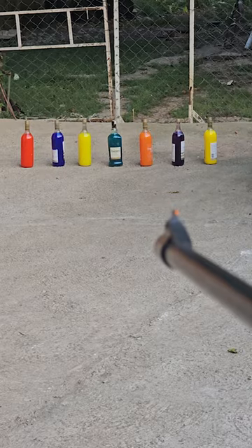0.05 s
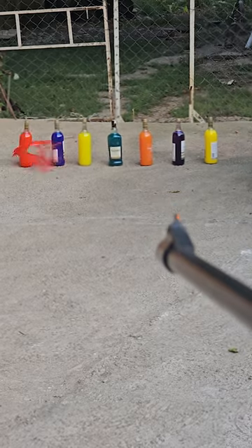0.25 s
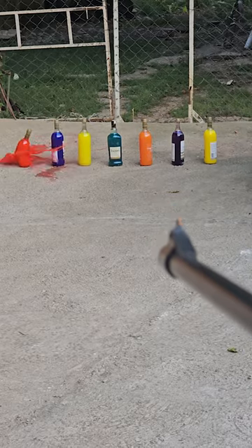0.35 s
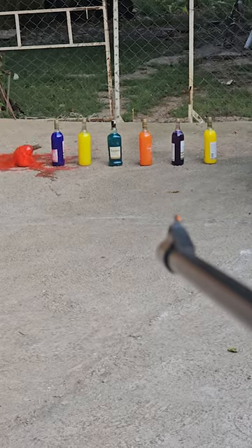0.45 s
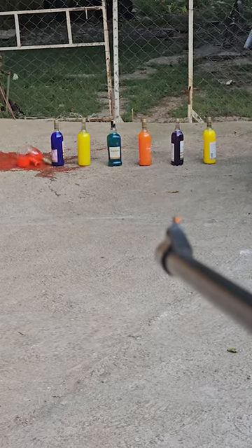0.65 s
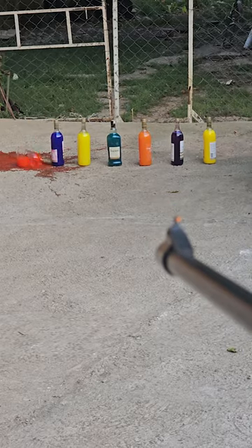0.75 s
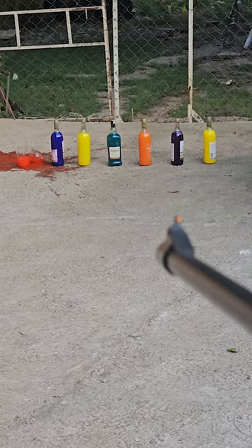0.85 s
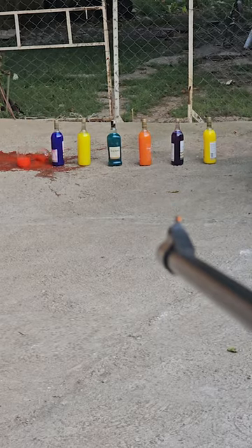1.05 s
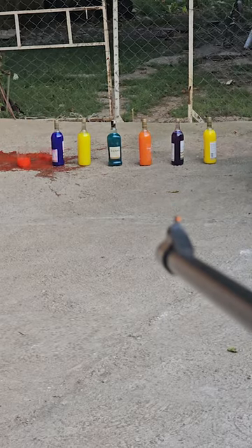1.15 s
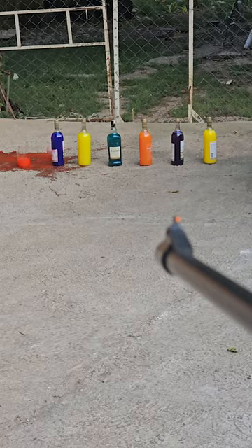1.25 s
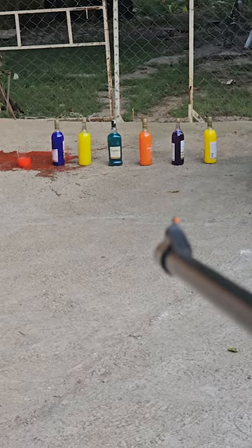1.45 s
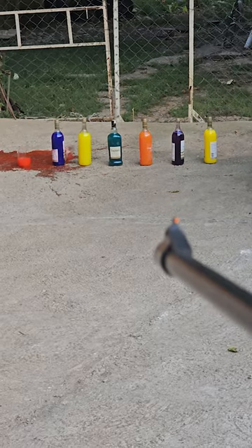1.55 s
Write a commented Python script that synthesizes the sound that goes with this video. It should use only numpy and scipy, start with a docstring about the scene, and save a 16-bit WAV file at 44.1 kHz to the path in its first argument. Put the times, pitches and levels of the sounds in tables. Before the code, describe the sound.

A sharp, nearby air rifle shot smashes a liquid-filled glass bottle across an outdoor yard. Heavy pieces knock and splinters ring on the concrete while the contents glug and splash, then a hollow fragment rocks softly over grit.

```python
"""A spring air rifle fires close by: the piston slides and slams, the muzzle pops, the spring buzzes.
At 0.29 s the pellet bursts a liquid-filled glass bottle on a concrete yard. Droplets and splinters
spray out and land, heavy pieces knock, shards ring and bounce, the liquid glugs and splashes.
From 0.77 s a hollow piece rolls and rocks over grit. The yard echoes faintly throughout."""
import sys
import numpy as np
from scipy import signal
from scipy.fft import rfft, irfft, next_fast_len
from scipy.io import wavfile
from scipy.ndimage import map_coordinates

SR = 44100
rng = np.random.default_rng(int(sys.argv[2]) if len(sys.argv) > 2 else 0)


def file_out(sig):
    """Save sig as 16-bit WAV at sys.argv[1]."""
    # one column per channel
    cols = np.atleast_2d(sig).T
    # limit, then scale
    lim = np.clip(cols, -1, 1)
    pcm = np.round(lim * 32767).astype(np.int16)
    wavfile.write(sys.argv[1], SR, pcm)


N = 70560

# Piston slam, muzzle pop, spring rebounds: start_s, level_db, t60_s
SHOT_PULSES = [(0.2477, -12, 0.038), (0.255, -19.5, 0.011), (0.2589, 1.5, 0.0093), (0.2645, -5.5, 0.012)]
# Rifle body: pitch_hz, level_db, t60_s
RIFLE_MODES = [(437.5, -14.5, 0.15), (210, -11.5, 0.041), (287, -23, 0.11), (636, -32, 0.12),
               (1318, -19, 0.11)]
# Rifle noise spectra: freq_hz, density_db
SHOT_SPECTRUM = [(60, -24.5), (130, -11.5), (480, 1.5), (1000, -12), (2500, -6), (4700, -16), (8500, -18.5),
                 (11200, -9.5), (13500, -17), (15500, -23)]
SNAP_SPECTRUM = [(1000, -17.5), (5000, -7.5), (8300, -0.5), (10000, -9.5), (13000, 0), (15500, -1.5)]
BUZZ_SPECTRUM = [(100, -24), (600, -3.5), (5500, -6), (8500, -11), (11500, -8), (15500, -13.5)]
# Handling rumble: time_s, level_db
HANDLING_LEVELS = [(0, -72), (.05, -58.5), (.15, -65), (.22, -58), (.29, -44.5), (.36, -51.5), (.42, -74),
                   (.6, -77.5)]
# Sprays of splinters and liquid: start_s, level_db, rise_s, t60_s
SPRAY_PULSES = [(.452, -21.5, 0.011, 0.36), (.476, -22.5, 0.0035, 0.2), (0.52, -28, 0.0018, 0.055),
                (.6, -33.5, .003, 0.21), (.67, -40.5, 0.014, 0.4), (0.779, -35.5, 0.0071, .3),
                (0.906, -49, .002, 0.7), (.997, -41.5, .002, 0.54), (1.24, -51.5, .005, 0.53)]
# Heavy pieces breaking and landing: start_s, pitch_hz, ring_db, t60_s, clack_db
KNOCK_HITS = [(.3036, 994, -10, 0.019, -20.5), (.306, 802, -22, 0.16, -45), (.453, 1456, -29, 0.14, -34.5),
              (.465, 1523, -20.5, 0.094, -34), (.478, 2144, -14, 0.026, -29),
              (0.519, 1368, -16.5, 0.068, -30.5), (.521, 748, -30.5, 0.068, -39),
              (.568, 1895, -29, 0.049, -38.5), (.575, 500, -33, 0.13, -63),
              (0.6528, 428, -24, 0.059, -34.5), (.672, 760, -33.5, 0.16, -41), (.686, 496, -36, 0.15, -36),
              (.823, 1250, -36, .07, -42), (.829, 825, -30, .07, -44), (1.247, 2270, -44.5, 0.084, -57),
              (1.354, 1280, -66, 0.045, -49.5)]
# Modes by shard name: pitch_hz, level_db, t60_s
SHARD_MODES = {"chip": [(10292, -6, .075), (11850, -26, .15), (9071, -28, .15)], "blade": [(4960, 0, .24),
               (11840, -7, .17), (9604, -13, .25), (7375, -19, .2)], "wall": [(2945, 0, .42),
               (9385, -13, .25), (3252, -12, .3), (2745, -10, .25), (3914, -9, .25)],
               "shoulder": [(2385, 0, .1), (3965, -8, .12), (9590, -9, .35)], "flake": [(10115, 0, .13),
               (9950, -14, .08)], "sliver": [(5882, -1, .38), (9390, -3, .28)],
               "needle": [(13100, -5, .35)], "corner": [(6288, -9, .22), (10300, -1, .12),
               (11870, -3, .15)]}
# Shards landing: start_s, shard, level_db, rise_s, pan_db
SHARD_HITS = [(0.311, "wall", -25.5, 0.0075, 6), (0.6004, "chip", -12.5, 0.0011, -7.5),
              (0.6096, "chip", -14, 0.0015, -5), (.612, "blade", -33, 0.0047, 6),
              (0.689, "shoulder", -31, 0.0017, 3), (0.712, "flake", -43, 0.00082, -6),
              (0.833, "chip", -37, 0.003, 0), (0.904, "flake", -39, 0.00036, -5),
              (0.667, "wall", -36, .002, 2.5), (.793, "blade", -37.5, .003, 5.5),
              (0.885, "needle", -43, .0066, 0), (0.998, "corner", -37, .0007, 1),
              (.95, "sliver", -44, .003, 5), (1.01, "sliver", -48, .006, 5), (1.028, "blade", -47, .004, 8),
              (1.033, "corner", -42, .0005, -2), (1.034, "flake", -33, .0007, -2),
              (1.065, "chip", -35, 0.0031, -7), (1.092, "flake", -39, 0.0013, -3.5),
              (1.306, "flake", -37, 0.014, -4), (1.379, "flake", -40.5, .007, 0),
              (1.433, "flake", -43, .008, -4)]
# Grit ticks: start_s, level_db
GRIT_HITS = [(0.3033, -6.5), (.48, -30), (1.068, -41), (1.248, -44), (.5195, -25), (.906, -35),
             (.9981, -33), (1.033, -32), (1.272, -39)]
# Hollow piece rolling: time_s, pitch_hz, level_db
ROLL_PATH = [(.765, 1020, -49), (.81, 950, -48), (.835, 830, -36), (.88, 875, -51), (.91, 900, -49),
             (1.0, 885, -50), (1.06, 925, -52), (1.11, 930, -58.5), (1.175, 930, -45.5),
             (1.235, 960, -42.5), (1.29, 950, -62), (1.33, 935, -63.5), (1.385, 870, -50.5),
             (1.445, 825, -53.5), (1.485, 840, -59), (1.55, 945, -51), (1.6, 930, -60.5)]
# Hollow piece bumping: start_s, pitch_hz, level_db
BUMP_HITS = [(0.864, 850, -38), (.942, 880, -39), (1.399, 860, -47), (1.419, 830, -45), (1.523, 900, -46),
             (1.187, 926, -29), (1.2146, 1000, -32), (1.2313, 926, -33.5), (1.2466, 1000, -38),
             (1.2583, 926, -44)]
# Glass noise spectra: freq_hz, density_db
SPRAY_SPECTRUM = [(150, -26), (400, -10.5), (800, 0.5), (1700, -7.5), (3000, -4.5), (5500, -2),
                  (8300, -8.5), (11500, -2), (15500, -14)]
CLACK_SPECTRUM = [(100, -32), (300, -32.5), (500, -1), (950, -1), (2000, -6), (4000, -13.5), (15000, -22)]
TICK_SPECTRUM = [(200, -20.5), (1000, -6), (4000, -5), (15500, -2.5)]
SCRAPE_SPECTRUM = [(100, -22), (300, -1.5), (520, 14.5), (900, 5), (1400, -7), (3000, -32), (15000, -6.5)]
# Glug of the emptying bottle: time_s, pitch_hz, level_db
GLUG_PATH = [(.32, 92.4, -43), (.35, 98.2, -46.5), (.45, 103.4, -40), (.5, 123.3, -42.5), (.56, 128.6, -47),
             (.62, 135.1, -47), (.68, 141, -83)]
# Big bubbles: start_s, pitch_hz, level_db
BIG_BUBBLES = [(0.476, 162.5, -27), (.577, 181.6, -23), (0.604, 236, -35.5), (0.736, 152, -38.5)]
# Pouring liquid: time_s, relative_db
SPLASH_LEVELS = [(.3, -55), (.345, -31.5), (.43, -42.5), (.5, -40.5), (.62, -43), (.69, -31.5),
                 (.77, -47.5), (.84, -40), (.92, -51.5), (1.1, -54), (1.6, -68.5)]
# Liquid and background spectra: freq_hz, density_db
SPLASH_SPECTRUM = [(25, -22), (80, -4), (180, -3), (550, 4), (1200, -1.5), (3000, -23), (15000, -16)]
HANDLING_SPECTRUM = [(15, -1), (33, 1.5), (70, 0.5), (150, -19.5), (400, -49)]
AIR_SPECTRUM = [(15, -9.5), (60, -3.5), (200, -10.5), (400, -19), (1100, -15.5), (1600, -27), (4000, -25.5),
                (8000, -55.5), (15000, -58)]
# Left-right likeness of noise: freq_hz, correlation
RIFLE_CORRELATION = [(200, 0), (800, 0.24), (3000, 0)]
YARD_CORRELATION = [(50, 0.63), (500, 0.98), (1200, 0.58), (3000, 0.046), (12000, 0.068)]
# Yard reverberation: freq_hz, t60_s
YARD_DECAY = [(150, 0.13), (1000, 0.38), (4000, 0.88), (12000, 0.55)]

RELEASE_S, SLAM_S, BURST_S = 0.2206, 0.25, 0.2902
TOP_HZ = 15900
LN_1000 = np.log(1000)  # 60 dB of decay
TIME_S = np.arange(N) / SR


def rifle(slide_db_per_s=1043):
    """The piston slides and slams; the shot snaps, the spring buzzes, the body rings."""
    sliding = (TIME_S > RELEASE_S) & (TIME_S < SLAM_S)
    slide = amp(-16 + slide_db_per_s * np.minimum(TIME_S - SLAM_S, 0)) * sliding
    power = slide ** 2 + sum((amp(db) * fade(s, t60_s)) ** 2 for s, db, t60_s in SHOT_PULSES)
    snap = amp(-10.5) * fade(0.2502, t60_s=0.01) * noise(SNAP_SPECTRUM, RIFLE_CORRELATION)
    buzz = amp(-16) * fade(SLAM_S, t60_s=0.29) * noise(BUZZ_SPECTRUM, RIFLE_CORRELATION)
    shot = np.sqrt(power) * noise(SHOT_SPECTRUM, RIFLE_CORRELATION)
    body = sum(amp(db) * ring(SLAM_S, hz, t60_s, rise_s=0.001, lead_rad=0.39)
               for hz, db, t60_s in RIFLE_MODES)
    return shot + snap + buzz + body


def recoil(jolt_hz=78, width_s=0.0083):
    """The kick: a low jolt and a dying sway over handling rumble."""
    age_s = TIME_S - SLAM_S
    jolt = amp(-15) * np.sin(2 * np.pi * jolt_hz * age_s) * np.exp(-(age_s / width_s) ** 2 / 2)
    sway = amp(-21.5) * ring(SLAM_S, hz=33.3, t60_s=0.13, rise_s=0.0022)
    handling = amp(curves(HANDLING_LEVELS)[0]) * noise(HANDLING_SPECTRUM)
    return pan(11) * (jolt + sway + handling)


def bottle_burst(rise_s=0.0029, hold_s=0.039, t60_s=0.17):
    """The bottle flies apart; sprays follow. Droplets hiss, splinters ring."""
    age_s = np.maximum(TIME_S - BURST_S, 0)
    decay = np.exp(-LN_1000 * np.maximum(age_s - hold_s, 0) / t60_s)
    burst = amp(-16) * (1 - np.exp(-age_s / rise_s)) * decay
    spray_power = sum((amp(db) * fade(s, t60, rise)) ** 2 for s, db, rise, t60 in SPRAY_PULSES)
    flow = np.sqrt(burst ** 2 + spray_power)
    hiss = amp(-5.5 + 0.9 * wobble(500)) * flow * noise(SPRAY_SPECTRUM)
    return hiss + amp(-5) * splinters(flow)


def splinters(flow, count=2200, low_hz=1500, range_db=25.5, median_t60_s=0.05):
    """Tiny pieces ring briefly, each scaled by the spray that carries it."""
    out = np.zeros((2, N + SR))
    age_s = np.arange(SR // 8) / SR
    for when, pitch, life, size, side, phase in rng.random((count, 6)):
        start = int(when * N)
        hz = low_hz + (TOP_HZ - low_hz) * pitch
        decay = np.exp(-LN_1000 * age_s / (median_t60_s * 2 ** (2 * life - 1)))
        gain = flow[start] * amp(range_db * size) * pan(10 * (2 * side - 1))
        tone = np.sin(2 * np.pi * (hz * age_s + np.array([[0], [phase]])))
        out[:, start:start + len(age_s)] += gain * decay * tone
    shaped = filtered(out[:, :N], lambda hz: amp(log_interp(SPRAY_SPECTRUM, hz)))
    return unit_rms(shaped) * np.sqrt(np.mean(flow ** 2))


def knocks():
    """Heavy wet pieces: a clack, a loose clatter and one short ring each."""
    clatter = amp(-5 + 2.5 * wobble(300))
    clacks = sum(amp(db) * (fade(s, t60_s=0.039) + clatter * fade(s, t60_s=0.086, rise_s=0.0011))
                 for s, _, _, _, db in KNOCK_HITS)
    rings = sum(amp(db) * ring(s, hz, t60_s, rise_s=0.00044, lead_rad=0.23)
                for s, hz, db, t60_s, _ in KNOCK_HITS)
    return clacks * noise(CLACK_SPECTRUM) + rings


def shards(chatter_hz=404, tick_t60_s=0.0088):
    """Landing shards tick and ring; skid chatter roughens high modes most. Grit only ticks."""
    rings = np.zeros((2, N))
    ticks = sum(amp(db) * fade(s, tick_t60_s) for s, db in GRIT_HITS)
    steady = np.exp(1j * np.array([[0.45], [-0.45]]) * -1)  # right leads
    for start_s, shard, level_db, rise_s, pan_db in SHARD_HITS:
        chatter = 0.78 * np.array([wobble(chatter_hz) + 1j * wobble(chatter_hz) for _ in range(2)])
        for hz, mode_db, t60_s in SHARD_MODES[shard]:
            tone = np.exp(2j * np.pi * hz * (TIME_S - start_s)) * (steady + chatter * np.sqrt(hz / TOP_HZ))
            rings += pan(pan_db) * amp(level_db + mode_db) * fade(start_s, t60_s, rise_s) * tone.imag
        ticks = ticks + amp(level_db - 10) * fade(start_s, tick_t60_s)
    return rings + ticks * noise(TICK_SPECTRUM)


def rolling(grain_hz=160, overtone_ratio=2.39):
    """Rough concrete excites the hollow piece; its pitch shifts as its mouth turns."""
    pitch_hz, level_db = curves(ROLL_PATH)
    phase = 2 * np.pi * np.cumsum(pitch_hz) / SR + np.array([[0.25], [-0.25]])
    contact = amp(level_db) * (TIME_S > ROLL_PATH[0][0])
    drive = contact * (wobble(grain_hz) + 1j * wobble(grain_hz))
    force = np.abs(drive) / np.abs(drive).max()
    overtone = amp(-30) * np.sqrt(force) * np.exp(1j * overtone_ratio * phase)
    tone = np.real(drive * (np.exp(1j * phase) + overtone))
    scrape = amp(-10) * contact * noise(SCRAPE_SPECTRUM)
    return pan(1.23) * tone + scrape


def bumps(t60_s=0.13, overtone_ratio=2.39):
    """The hollow piece rocks and crunches grit; its close tones overlap and beat."""
    tones = crunch = 0
    for start_s, hz, db in BUMP_HITS:
        cavity = ring(start_s, hz, t60_s, rise_s=0.003, lead_rad=0.4)
        overtone = amp(-20) * ring(start_s, overtone_ratio * hz, t60_s)
        tones += amp(db) * (cavity + overtone)
        crunch += amp(db - 15) * fade(start_s, t60_s=0.053)
    return pan(4.2) * tones + crunch * noise(CLACK_SPECTRUM)


def liquid():
    """The contents glug out, bubble and splash on the concrete."""
    glug_hz, glug_db = curves(GLUG_PATH)
    emptying = (TIME_S > GLUG_PATH[0][0]) & (TIME_S < GLUG_PATH[-1][0])
    glug = emptying * amp(glug_db + 1.3 * wobble(28)) * np.sin(2 * np.pi * np.cumsum(glug_hz) / SR)
    bubbles = sum(amp(db) * ring(s, hz, t60_s=0.064, rise_s=0.0042) for s, hz, db in BIG_BUBBLES)
    splash_db = curves(SPLASH_LEVELS)[0] - 5.5 + 4.1 * wobble(90)
    pouring = TIME_S > SPLASH_LEVELS[0][0]
    return glug + bubbles + pouring * amp(splash_db) * noise(SPLASH_SPECTRUM)


def walls(x, count=8, max_delay_s=0.033):
    """Early reflections, random in delay and sign on each side."""
    out = np.zeros((2, N))
    for side in range(2):
        for delay, sign in rng.random((count, 2)):
            lag = 1 + int(delay * max_delay_s * SR)
            out[side, lag:] += np.sign(sign - 0.5) * x[side, :-lag]
    return out / np.sqrt(count)


def yard(x, rise_s=0.0018):
    """Diffuse tail; each frequency decays at its own rate."""
    hz, age_s, bins = signal.stft(rng.standard_normal((2, SR // 2)), SR, nperseg=256)
    decay = np.exp(-LN_1000 * age_s / log_interp(YARD_DECAY, hz)[:, None])
    tail = signal.istft(bins * decay * (1 - np.exp(-age_s / rise_s)), SR, nperseg=256)[1]
    return signal.fftconvolve(x, tail / np.linalg.norm(tail[0]), axes=1)[:, :N]


def amp(db):
    """Decibels to gain."""
    return 10 ** (np.asarray(db) / 20)


def pan(db):
    """Stereo gains, left minus right in dB."""
    return amp(np.array([[db], [-db]]) / 2)


def unit_rms(x):
    """Scale to rms 1."""
    return x / np.sqrt(np.mean(x ** 2) + 1e-20)


def log_interp(points, hz):
    """Interpolate (freq_hz, value) rows on a log axis."""
    freq_hz, values = np.transpose(points)
    return np.interp(np.log(hz + 1), np.log(freq_hz + 1), values)


def curves(rows):
    """One per-sample curve for each column after time_s."""
    time_s, *columns = np.transpose(rows)
    return [np.interp(TIME_S, time_s, column) for column in columns]


def wobble(rate_hz):
    """Smooth random curve, rate_hz knots a second."""
    return map_coordinates(rng.standard_normal(4096), [TIME_S * rate_hz], mode="wrap")


def filtered(x, response):
    """Zero-phase filter with gain response(hz)."""
    size = next_fast_len(N + SR // 4)
    return irfft(rfft(x, size) * response(np.fft.rfftfreq(size, 1 / SR)), size)[..., :N]


def noise(spectrum, correlation=YARD_CORRELATION):
    """Coloured, partly correlated stereo noise, rms 1."""
    def mid_side_gains(hz):
        angle = np.arccos(np.clip(log_interp(correlation, hz), -1, 1)) / 2
        return amp(log_interp(spectrum, hz)) * [np.cos(angle), np.sin(angle)]
    mid, side = filtered(rng.standard_normal((2, N)), mid_side_gains)
    return unit_rms(np.array([mid + side, mid - side]))


def fade(start_s, t60_s, rise_s=0.00027):
    """Exponential rise and decay."""
    age_s = np.maximum(TIME_S - start_s, 0)
    return (1 - np.exp(-age_s / rise_s)) * np.exp(-LN_1000 * age_s / t60_s)


def ring(start_s, hz, t60_s, rise_s=0.00032, lead_rad=0):
    """One decaying mode; left leads right by lead_rad."""
    phase = 2 * np.pi * hz * (TIME_S - start_s) + np.array([[lead_rad], [-lead_rad]]) / 2
    return fade(start_s, t60_s, rise_s) * np.sin(phase)


def scene():
    """Near rifle, far glass and liquid, echoes, quiet outdoor air."""
    gun = recoil() + rifle()
    glass = bottle_burst() + knocks() + shards() + rolling() + bumps()
    echo = amp(-10) * walls(glass) + yard(amp(-8.5) * gun + amp(-12) * glass)
    return gun + glass + liquid() + echo + amp(-68) * noise(AIR_SPECTRUM)


def record(dry):
    """Soft peak limit, then a steep low-pass at TOP_HZ."""
    limited = dry / (1 + np.abs(dry / 0.9) ** 6) ** (1 / 6)
    return filtered(limited, lambda hz: 1 / np.sqrt(1 + (hz / TOP_HZ) ** 160))


dry = scene()
out = record(dry)
file_out(out)
```